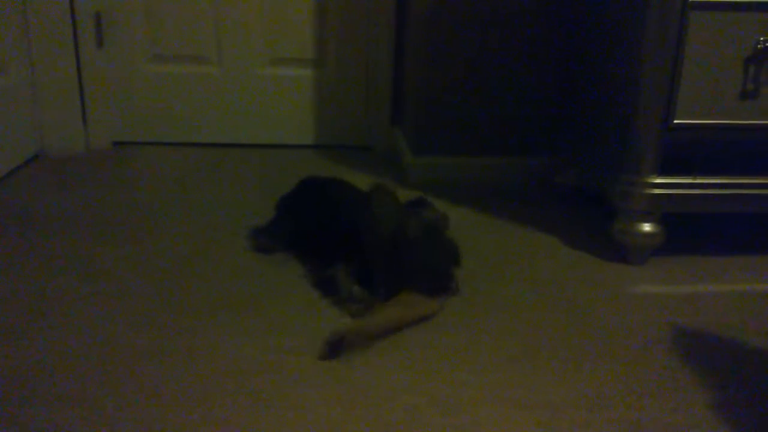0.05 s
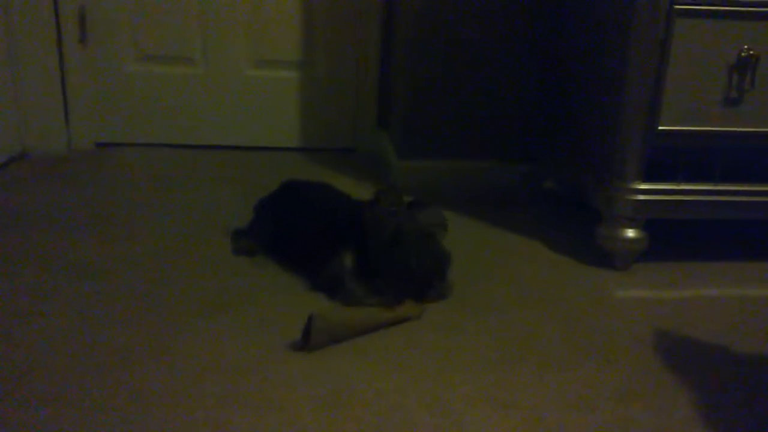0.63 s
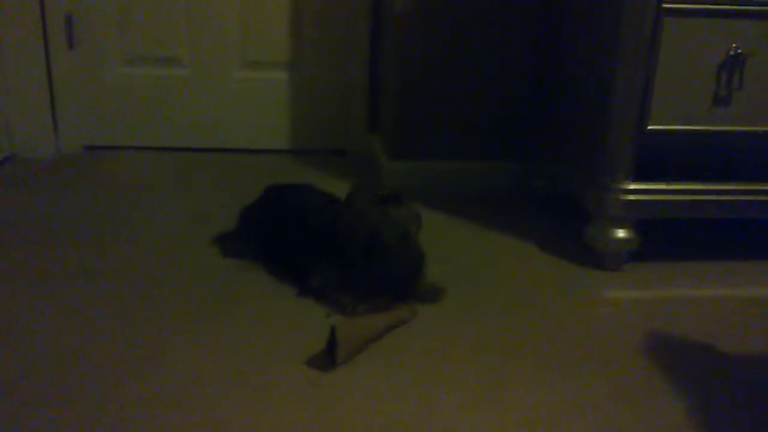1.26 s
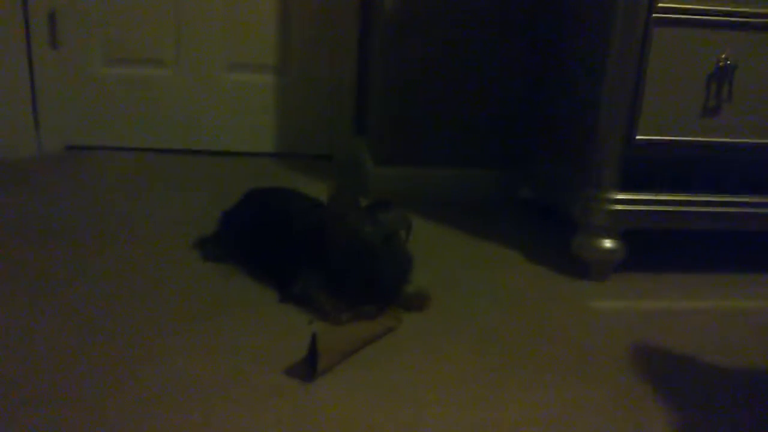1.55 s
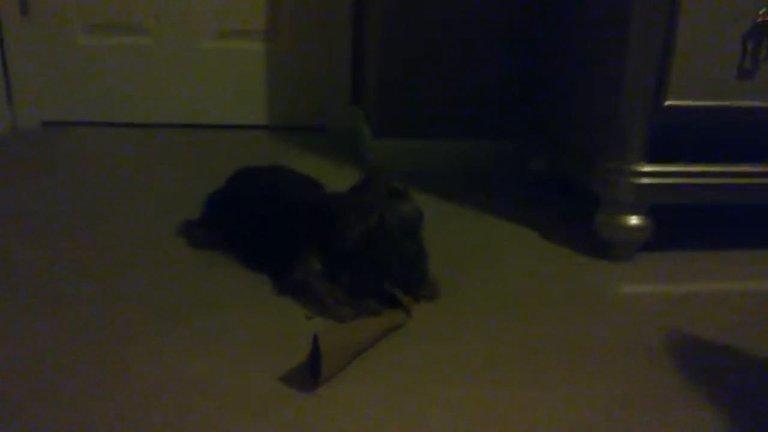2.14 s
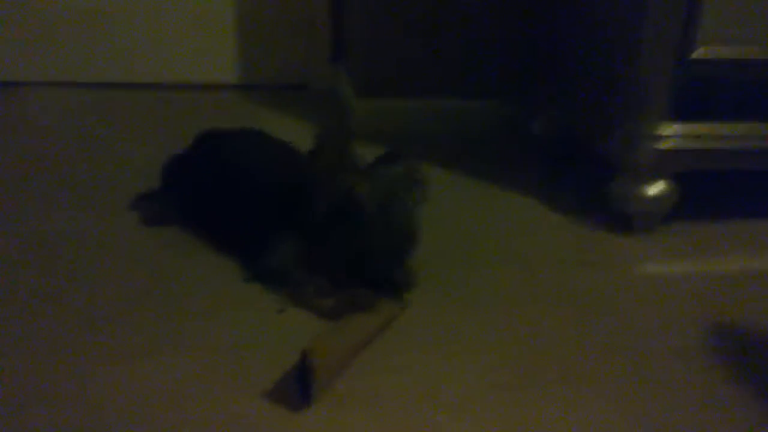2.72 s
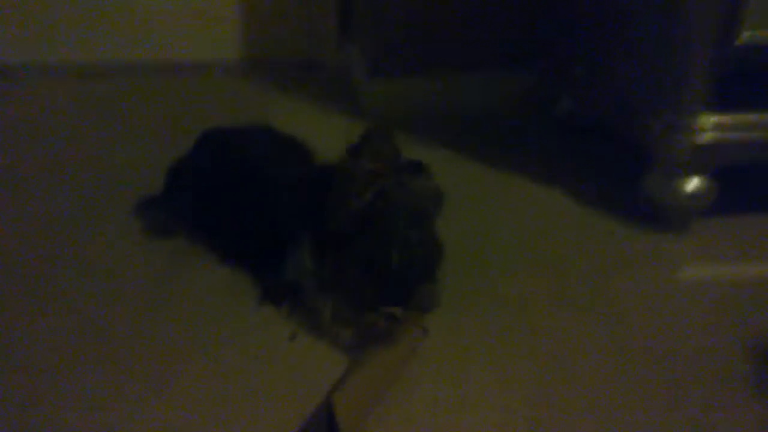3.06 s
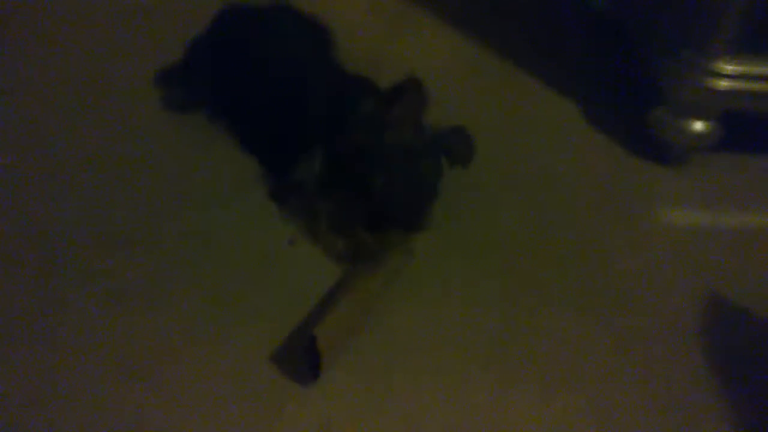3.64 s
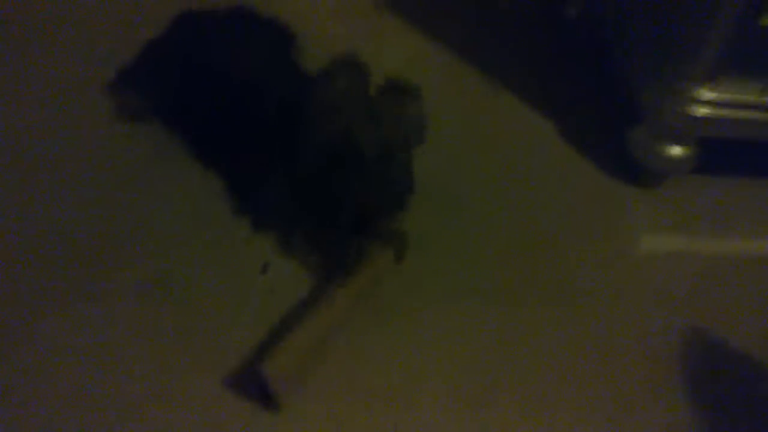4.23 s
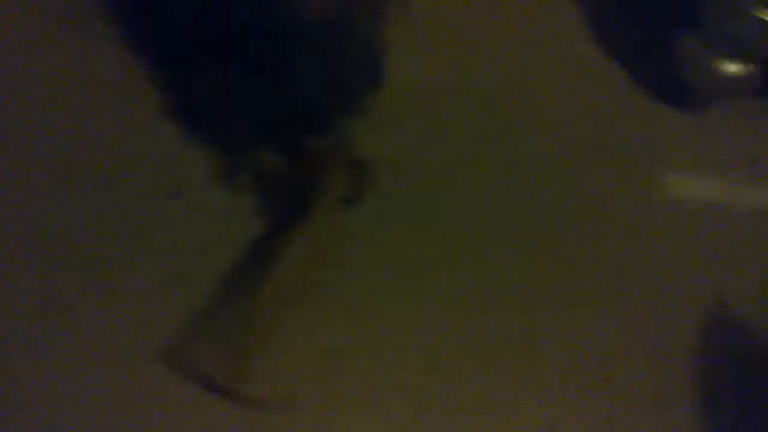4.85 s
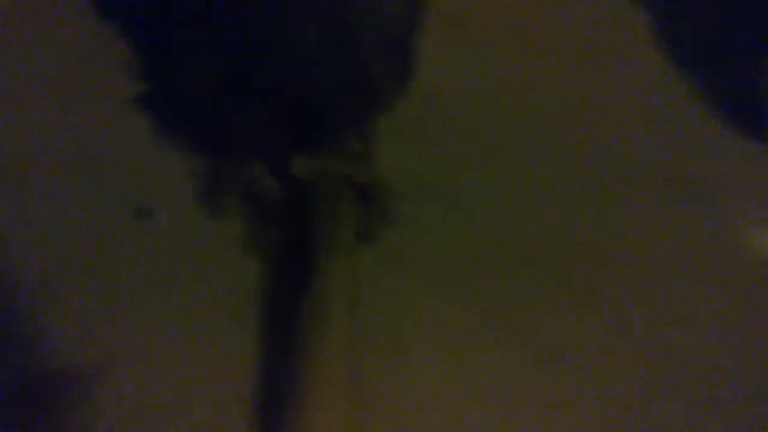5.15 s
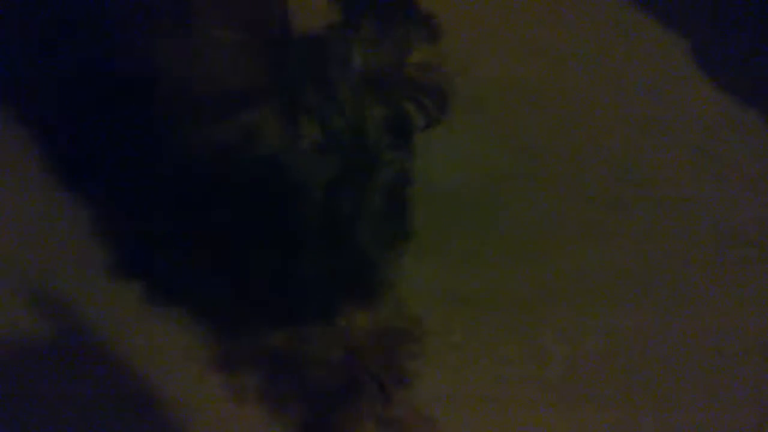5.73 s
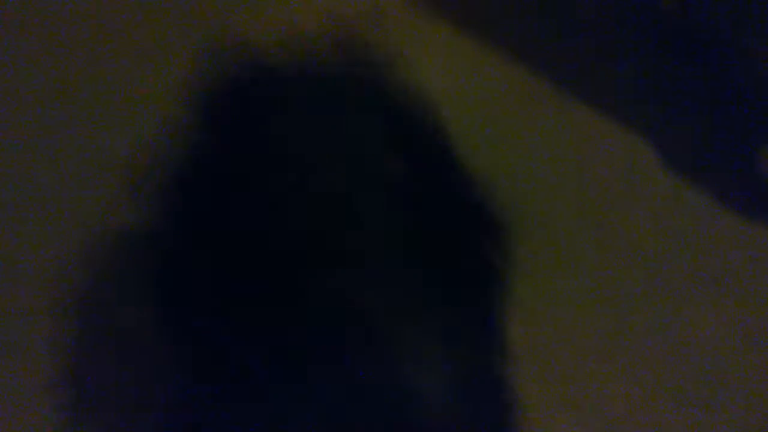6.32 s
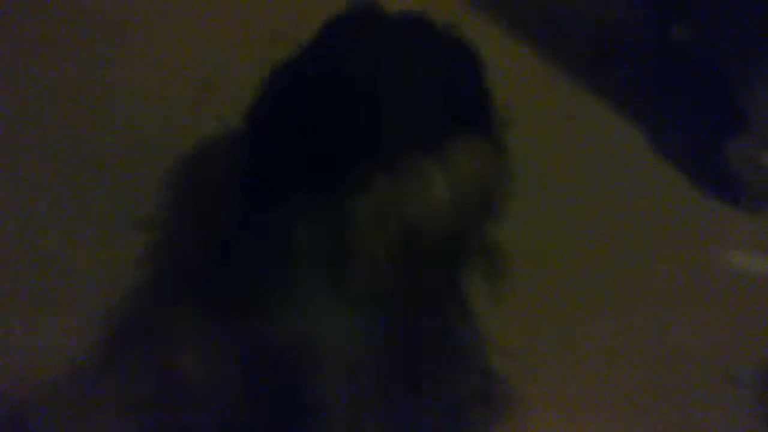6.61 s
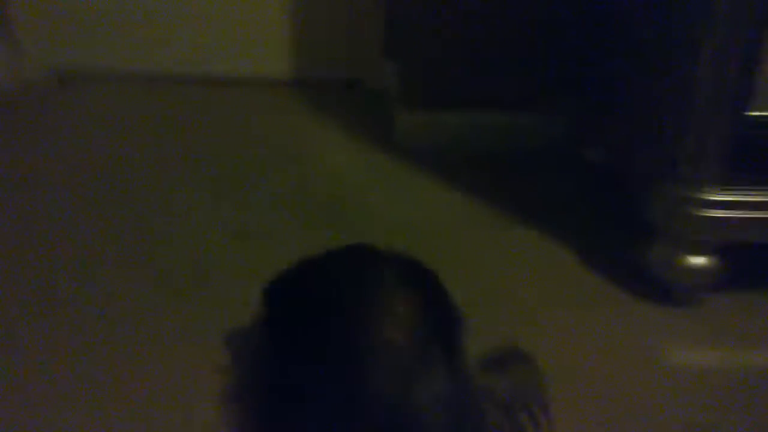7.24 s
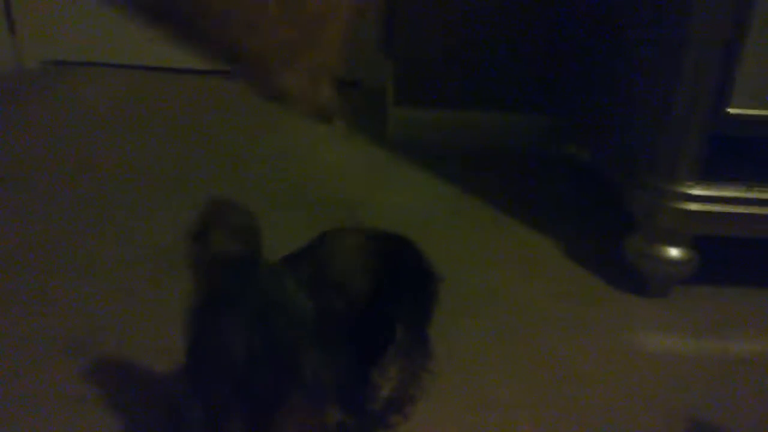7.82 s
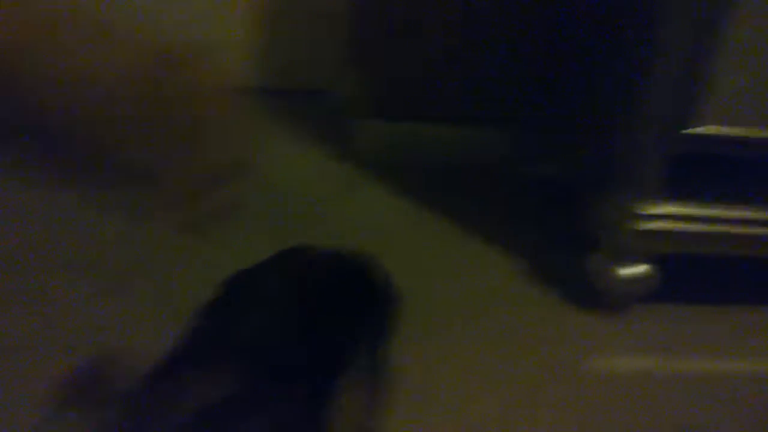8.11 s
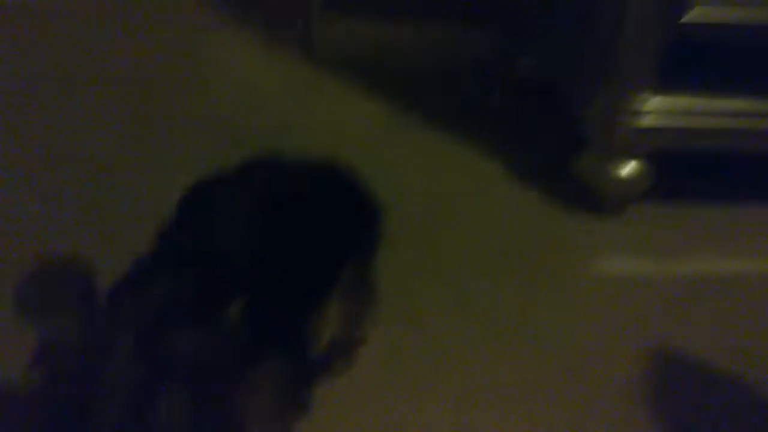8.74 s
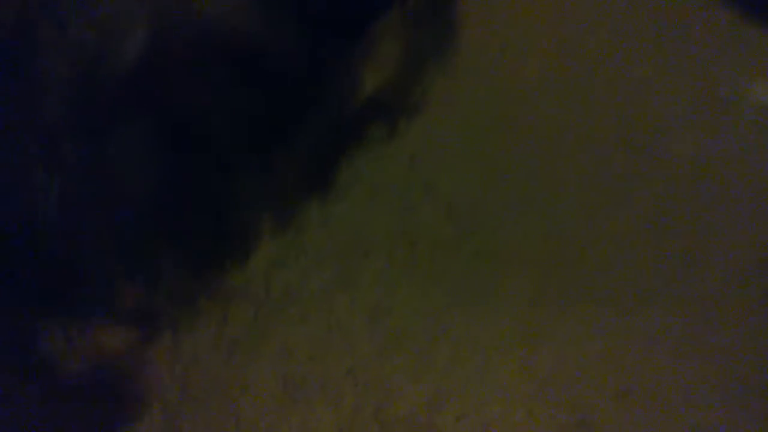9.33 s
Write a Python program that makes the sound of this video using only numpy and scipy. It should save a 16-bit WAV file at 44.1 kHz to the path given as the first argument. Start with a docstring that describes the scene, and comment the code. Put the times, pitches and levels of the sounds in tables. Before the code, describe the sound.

Irregular close bites and scrapes on a cardboard tube, mixed with carpet rustle, soft paw thuds and a dog's clinking tags.

```python
"""First comes a soft brushing on bedroom carpet, with light taps and a jingle of collar tags.
A small dog is worrying a cardboard tube close by, gently at first and hardest in the middle.
Teeth and paws knock and scrape on the hollow tube, and fur and card rub through the carpet pile.
Paws thud on the floor, the metal tags ring as they touch, and the snout noses about in soft puffs.
The tube swishes round once, a hand bumps the microphone once, and a quiet room hisses behind it all."""
import numpy as np
from scipy import signal
from scipy.fft import rfft, irfft
import sys
import numpy as np
from scipy import signal
from scipy.fft import rfft, irfft
from scipy.io import wavfile

SR = 44100
rng = np.random.default_rng(int(sys.argv[2]) if len(sys.argv) > 2 else 0)


def transcribe(signal):
    """Save signal, clipped to [-1, 1], as a 16-bit WAV file at the path in sys.argv[1]."""
    frames = np.atleast_2d(signal).T
    limited = np.clip(frames, -1, 1)
    pcm = np.round(limited * 32767).astype(np.int16)
    wavfile.write(sys.argv[1], SR, pcm)


N = 422037

# bites and taps on the tube (time [s], resonance [Hz], hollow body [dB], crack [dB], treble snap [dB])
BITES = [(0.047, 340, -69, -70, -44.5), (0.305, 2800, -56, -48.5, -37), (0.431, 860, -32.5, -47.5, -40),
         (0.592, 1150, -24.5, -45, -29.5), (0.753, 1000, -51, -42.5, -21.5), (1.235, 616, -50.5, -67, -41),
         (1.745, 1420, -64, -72, -47), (2.866, 1120, -52.5, -53, -36), (3.132, 530, -72, -57, -27.5),
         (3.551, 715, -53.5, -62, -45.5), (3.929, 1160, -41.5, -58, -72), (4.074, 290, -34.5, -46.5, -34),
         (4.119, 650, -36.5, -52, -45), (4.156, 322, -26.5, -44, -47), (4.216, 430, -14.5, -33, -20.5),
         (4.23, 391, -20, -27.5, -34.5), (4.487, 2630, -15.5, -24.5, -20), (4.617, 305, -22, -40.5, -29.5),
         (4.629, 616, -23, -31, -26.5), (4.82, 1430, -19, -29.5, -19.5), (4.841, 1520, -11.5, -16, -13.5),
         (4.934, 520, -23, -16, -26.5), (5.044, 3020, -18.5, -24, -16.5), (5.498, 870, -14.5, -58, -15),
         (5.582, 372, -25, -42, -42), (5.696, 940, -29.5, -61.5, -22.5), (5.738, 300, -23, -34.5, -11),
         (5.975, 716, -25, -56, -13.5), (6.163, 2300, -28, -49, -38), (6.229, 2790, -17.5, -51.5, -21.5),
         (6.786, 1410, -27, -36, -17.5), (7.002, 1660, -17, -27, -3), (7.08, 2564, -17.5, -15.5, -3.5),
         (7.374, 2330, -42, -44, -44), (8.032, 675, -61.5, -74.5, -52), (8.9, 2370, -54.5, -81, -56),
         (9.102, 2360, -44.5, -60.5, -34), (9.29, 2300, -51.5, -77, -36)]
# muzzle, teeth, claws or carpet dragging over the tube
# (time [s], length [s], resonance [Hz], hollow body [dB], treble snap [dB])
STROKES = [(0.44, 0.032, 840, -43.5, -43.5), (0.584, 0.037, 710, -41.5, -51.5),
           (0.655, 0.044, 1500, -46, -32), (0.745, 0.05, 790, -45.5, -32.5),
           (1.25, 0.062, 1260, -61.5, -48), (2.52, 0.049, 530, -65.5, -56), (2.889, 0.033, 360, -39.5, -30),
           (3.203, 0.014, 670, -49.5, -36), (3.341, 0.041, 2800, -54.5, -57), (3.46, 0.058, 1060, -67, -65),
           (3.781, 0.019, 2500, -53, -47.5), (4.227, 0.018, 400, -29, -32),
           (4.347, 0.052, 2800, -38.5, -34), (4.677, 0.01, 1330, -23.5, -24),
           (4.716, 0.019, 1260, -35, -26.5), (4.765, 0.016, 300, -26, -19), (4.848, 0.003, 300, -23.5, -19),
           (4.919, 0.019, 530, -18, -14), (4.948, 0.019, 790, -22, -20), (5.458, 0.026, 500, -38.5, -30.5),
           (5.499, 0.003, 890, -23, -15.5), (5.734, 0.055, 2360, -29.5, -25),
           (5.811, 0.011, 2225, -19, -17), (5.904, 0.024, 380, -33, -30.5), (5.966, .008, 710, -30, -23.5),
           (6.094, 0.0061, 360, -46, -34), (6.208, .02, 600, -29, -19.5), (7.011, .026, 2600, -22.5, -6.5),
           (7.034, 0.033, 1410, -19.5, -11), (8.162, 0.01, 2800, -81.5, -49.5),
           (8.194, 0.018, 630, -69.5, -48.5), (8.608, 0.028, 2400, -66, -53),
           (8.693, 0.042, 790, -70.5, -56), (8.918, 0.036, 890, -79, -46), (9.133, 0.024, 790, -49.5, -39),
           (9.401, 0.044, 960, -40.5, -34.5)]
# the dog shifts itself or the tube (time [s], length [s], tube rubbing [dB], carpet and fur hiss [dB])
BODY_SHIFTS = [(0.004, 0.12, -69, -57), (0.156, 0.16, -66.5, -53), (0.572, 0.18, -51, -41),
               (0.867, 0.25, -67, -51.5), (1.372, 0.09, -68.5, -54.5), (1.554, 0.043, -74.5, -58.5),
               (2.17, 0.018, -86, -68.5), (2.583, 0.1, -72, -63), (2.737, 0.17, -65.5, -52.5),
               (3.027, 0.18, -59.5, -43.5), (3.875, 0.35, -62, -60), (4.09, 0.074, -47.5, -46),
               (4.523, 0.37, -33, -38), (5.12, 0.16, -54, -45), (5.392, .05, -50, -37),
               (5.565, 0.23, -40.5, -39), (5.78, 0.18, -38.5, -34), (6.31, 0.063, -54, -31.5),
               (6.397, 0.2, -49.5, -43), (6.721, 0.15, -49, -41.5), (7.366, 0.031, -53.5, -50),
               (7.569, .03, -68, -57), (8.38, .05, -81.5, -76), (8.757, 0.54, -72, -56),
               (9.193, 0.33, -63, -51.5), (9.507, 0.12, -38.5, -32)]
# paws and body landing on the floor (time [s], level [dB], boom pitch [Hz])
LANDINGS = [(0.189, -49.5, 141), (0.456, -32, 141), (2.89, -45, 190), (4.21, -34, 350), (4.414, -37, 380),
            (4.841, -25.5, 350), (4.932, -27, 288), (5.458, -32, 205), (5.731, -27.5, 228),
            (5.901, -29, 265), (5.969, -28, 247), (6.22, -21.5, 101), (6.36, -40, 200), (6.457, -36.5, 127),
            (6.61, -35.5, 114), (6.775, -31, 203), (6.995, -26, 272), (7.327, -46.5, 196.6),
            (7.557, -43, 98.7), (7.6, -52, 105.3), (9.095, -44, 126), (9.449, -39.5, 186)]
# tags touching (time [s], time until fur damps them [s], collar ring [dB], large tag [dB], small tag [dB])
TAG_TOUCHES = [(0.187, .02, -72, -56, -39), (0.247, .02, -67, -56, -38), (0.255, .02, -57, -52, -32.5),
               (0.277, 0.029, -48, -60, -49), (2.932, .035, -47, -57, -35),
               (3.075, 0.0059, -64, -43, -18.5), (3.079, .056, -47, -50.5, -36),
               (4.394, .015, -66, -50, -33.5), (4.424, .01, -64.5, -44.5, -28.5),
               (6.262, .2, -22.5, -12, -19), (6.288, 0.047, -30.5, -23.5, -28.5),
               (6.56, 0.011, -34.5, -39, -52), (6.591, 0.0054, -40.5, -35.5, -41),
               (6.837, 0.044, -59.5, -49, -22.5), (7.175, .02, -45, -34, -15)]
# the dog nosing about (middle time [s], length [s], level [dB])
SNOUT_PUFFS = [(1.69, .035, -76), (3.254, 0.045, -62), (3.559, 0.14, -71), (5.403, 0.058, -47),
               (6.101, 0.02, -45), (7.963, 0.029, -66.5), (8.212, 0.039, -69.5), (8.716, 0.055, -62),
               (8.944, 0.048, -57), (9.158, 0.1, -50), (9.313, 0.01, -55.5), (9.54, 0.032, -37.5)]

# the tones each metal piece rings with (frequency [Hz], level [dB], time to fade by 60 dB [s])
RING_TONES = [(5700, -39, 0.1), (8337, 5, 0.083), (8200, -8.5, 0.16)]
LARGE_TAG_TONES = [(5610, -26, .35), (8325, -23, .5), (12060, -21, .2), (12210, -15, .19), (12850, -9, .23),
                   (12905, 0, .23), (12960, -9, .2), (15500, -21, .19)]
SMALL_TAG_TONES = [(13300, -16.5, 0.014), (12000, -10.5, .08), (13400, -7, .07), (13500, 3, 0.046),
                   (13600, -5, .05), (14000, -8.5, .05)]

# tone colours: how strong each sound is from low to high (frequency [Hz], level [dB])
TUBE_COLOUR = [(130, -36.5), (230, -17), (350, -6.5), (560, -5), (660, 0), (930, -0.5), (1120, -4.5),
               (1300, -1), (1480, 2), (2100, -2), (2600, -9.5), (3200, -13.5), (4500, -44)]  # the tube's hollow body
CRACK_COLOUR = [(2200, -22), (3100, -10), (4000, -2), (5500, -0.5), (6500, -7.5), (7500, -14),
                (9000, -35.5)]  # its wall cracking
SNAP_COLOUR = [(6000, -37.5), (7600, -22), (8800, -9.5), (10300, -4), (11500, -6), (13200, 3),
               (14500, -1.5), (16000, -6.5)]  # fine fibres snapping
RUB_COLOUR = [(180, -19), (330, -5.5), (560, -5.5), (770, -1.5), (950, -4.5), (1120, -7.5), (1500, -4),
              (1800, -4), (2250, -6), (3100, -13.5), (4800, -21.5), (7500, -23.5), (10000, -52)]  # card rubbing on carpet
PILE_COLOUR = [(2000, -47.5), (3500, -28), (5200, -23.5), (7200, -18.5), (8500, -11.5), (10000, -7.5),
               (11500, -5), (13300, 1.5), (14500, -4.5), (16000, -11.5)]  # carpet pile and fur hissing
RUMBLE_COLOUR = [(20, -1), (45, 1), (110, 1.5), (200, -8), (300, -10), (500, -18), (1000, -51.5)]  # the floor under the moving dog
THUD_COLOUR = [(25, -6.5), (60, -9), (115, -2), (170, -1), (260, -2.5), (400, -7), (900, -41)]  # the floor under a landing
SKID_COLOUR = [(3000, -40), (5000, -16.5), (5800, -9), (6800, -15.5), (11000, -11.5), (13500, -0.5),
               (16000, -5)]  # metal sliding on metal
SNOUT_COLOUR = [(400, -7), (620, -16), (790, 4.5), (1000, -5), (1300, -13), (2000, -11), (2300, -0.5),
                (2550, -11.5), (4500, -53.5)]  # a puff with two hollow resonances
SWISH_COLOUR = [(1500, -28.5), (2600, 1), (3500, -3), (4500, -0.5), (5400, -16.5), (7500, -35.5)]  # the tube sliding round
BUMP_COLOUR = [(20, -2), (35, 9), (55, -12), (100, -31), (300, -60)]  # a hand bumping the microphone
ROOM_COLOUR = [(20, -3), (45, 2), (65, -3), (105, 6), (165, -11), (260, -11.5), (650, -7), (1200, -12),
               (3500, -14.5), (8000, -10.5), (10000, -8), (13200, -7), (16000, -12)]  # the quiet room


def tube():
    """Knocks and scrapes sound the tube's body, wall and fibres, each with its own short echo."""
    body, crack, snap = from_db(-2.5) * knocks() + scrapes()
    return (with_room(body, wet_db=-6.5, fade_s=0.17)
            + with_room(crack, wet_db=-7, fade_s=0.31)
            + with_room(snap, wet_db=-9.5, fade_s=0.12))


def knocks(body_decay_s=0.0049, crack_decay_s=0.005, rise_s=0.0008, click=0.45):
    """Each bite is a click, then fibres crushing under two teeth. Gives body, crack and snap."""
    layers, t = np.zeros((3, N)), np.arange(SR // 12) / SR
    decays_s = [[body_decay_s], [crack_decay_s], [crack_decay_s]]
    first_tooth, second_tooth = (np.exp(-age / decays_s) * np.minimum(age / rise_s, 1)
                                 for age in (t, np.maximum(t - 0.0072, 0)))
    pressure = np.hypot(first_tooth, from_db(-15.5) * second_tooth)  # the later tooth is lighter
    for start, hz, *levels_db in BITES:
        crush = rng.standard_normal((3, len(t))) * pressure
        crush[:, 0] = click * np.linalg.norm(crush, axis=1)
        for layer, part, db in zip(layers, cardboard(*crush, hz, sharpness=2.1), levels_db):
            add(layer, start, from_db(db) * part / np.std(part[:SR // 160]))
    return layers


def scrapes(fall_s=0.01, lead_s=0.006, judder_db=1.5):
    """Each stroke swells, judders along the card and lets go. Gives body, crack and snap."""
    layers, t = np.zeros((3, N)), np.arange(SR // 6) / SR
    judder = from_db(judder_db * drift(260))
    grit = [friction(3500, spread_db=5, smooth=0.7) * judder for _ in layers]
    for start, length, hz, body_db, snap_db in STROKES:
        crack_db = (body_db + snap_db) / 2 - 12.5
        rise = np.minimum(t / (lead_s + length * 0.56), 1) ** 1.3
        release = np.exp(-np.maximum(t - lead_s - length * 1.144, 0) / fall_s)
        pressed = [np.roll(slips, -round(start * SR))[:len(t)] * rise * release for slips in grit]
        parts = cardboard(*pressed, hz, sharpness=4.3)
        for layer, part, db in zip(layers, parts, (body_db, crack_db, snap_db)):
            strength = np.sqrt(np.sum(part ** 2) / (length * SR))
            add(layer, start - lead_s, from_db(db) * part / strength)
    return layers


def cardboard(body, crack, snap, hz, sharpness, boost_db=11):
    """The tube colours every contact, and each spot on it favours one hollow pitch."""
    hollow = body + from_db(boost_db) * resonate(body, hz, sharpness)
    return colour(hollow, TUBE_COLOUR), colour(crack, CRACK_COLOUR), colour(snap, SNAP_COLOUR)


def shuffle():
    """Card and fur slide over the pile in small jerks, and the floor rumbles along."""
    rub_db, hiss_db = movement_levels()
    rumble_db = -61 + 0.64 * ((rub_db + hiss_db) / 2 + 45)  # more movement, more rumble
    jerks = drift(70)
    sliding = from_db(rub_db - 2 + 2 * jerks) * friction(900, spread_db=0.5, smooth=0.8)
    # as the grip shifts, the tube's resonances come and go
    resonances = sum(resonate(sliding, hz, 9) * drift(22) for hz in np.geomspace(330, 2300, num=9))
    rub = colour(sliding + 0.52 * resonances, RUB_COLOUR)
    brushing = from_db(hiss_db + 0.5 + 2.4 * jerks) * friction(3000, spread_db=2.5, smooth=0.89)
    hiss = colour(brushing, PILE_COLOUR)
    rumble = colour(from_db(rumble_db + 1.8 * jerks) * rng.standard_normal(N), RUMBLE_COLOUR)
    # now and then a single fibre crackles
    crackle = colour(from_db(rub_db - 25.5) * friction(40, spread_db=5, smooth=0.11), CRACK_COLOUR)
    return with_room(rub + crackle, wet_db=-14, fade_s=0.047) + hiss + rumble


def movement_levels(gather_db_per_s=402, settle_db_per_s=119, lag_s=0.01, hold_s=0.0083):
    """Rubbing and hiss levels in dB: every movement builds quickly and settles slowly."""
    t = np.arange(0, N, 64) / SR
    # each stroke drags the tube a moment later; the hiss is capped for the sharpest snaps
    drags = [(start + lag_s, length + hold_s, body_db - 9, min(snap_db - 10.5, -29.5))
             for start, length, _, body_db, snap_db in STROKES]
    start, length, rub_db, hiss_db = np.transpose(BODY_SHIFTS + drags)[:, :, None]
    gather_db = -gather_db_per_s * np.maximum(start - t, 0)
    settle_db = -settle_db_per_s * np.maximum(t - start - length, 0)
    levels = []
    for moving_db, resting_db in ((rub_db, -87.5), (hiss_db, -83)):
        power = np.sum(from_db(moving_db + gather_db + settle_db) ** 2, axis=0) + from_db(resting_db) ** 2
        levels.append(np.interp(np.arange(N) / SR, t, 10 * np.log10(power)))
    return levels


def collar(scatter_db=1.5, attack_s=0.00033, damped_s=0.01):
    """Each touch strikes the metal's tones a little unevenly; they ring until fur damps them."""
    out, t = np.zeros(N), np.arange(SR // 2) / SR
    for start, free_s, *strikes_db in TAG_TOUCHES:
        shape = (1 - np.exp(-t / attack_s)) * np.exp(-np.maximum(t - free_s, 0) / damped_s)
        for tones, strike_db in zip((RING_TONES, LARGE_TAG_TONES, SMALL_TAG_TONES), strikes_db):
            hz, tone_db, fade_s = np.transpose(tones)[:, :, None]
            struck_db = strike_db + 6.5 + tone_db + scatter_db * rng.standard_normal(hz.shape)
            waves = np.sin(2 * np.pi * (hz * t + rng.random(hz.shape)))
            add(out, start, shape * np.sum(from_db(struck_db - 60 * t / fade_s) * waves, axis=0))
        # the small tag skids across its neighbour
        skid = colour(rng.standard_normal(len(t)) * np.exp(-t / 0.0094), SKID_COLOUR)
        add(out, start, from_db(strikes_db[-1] - 5) * skid)
    return with_room(out, wet_db=-9.5, fade_s=0.2)


def paws(rise_s=0.0018, decay_s=0.022, gain_db=-1.5):
    """Soft landings shake the carpeted floor, which booms briefly."""
    out, t = np.zeros(N), np.arange(SR // 4) / SR
    for start, db, hz in LANDINGS:
        push = rng.standard_normal(len(t)) * np.minimum(t / rise_s, 1) * np.exp(-t / decay_s)
        thud = colour(push + from_db(10) * resonate(push, hz, sharpness=4), THUD_COLOUR)
        add(out, start, from_db(db + gain_db) * thud / np.abs(thud).max())
    return out


def snout():
    """The dog noses about in soft, hollow puffs."""
    return puffs(SNOUT_PUFFS, SNOUT_COLOUR)


def tube_swish(time_s=5.25, length_s=0.11, level_db=-48.5):
    """The tube slides round with one soft swish."""
    return puffs([(time_s, length_s, level_db)], SWISH_COLOUR)


def hand_bump(time_s=4.555, length_s=0.05, level_db=-39.5):
    """The hand holding the microphone bumps it, making one deep thump."""
    return puffs([(time_s, length_s, level_db)], BUMP_COLOUR)


def quiet_room(level_db=-74.5):
    """The room's faint, steady hiss."""
    return from_db(level_db) * colour(rng.standard_normal(N), ROOM_COLOUR)


def with_room(x, wet_db, fade_s, build_s=0.00044):
    """Add the room's dense echo, which builds up and then drops 60 dB in fade_s."""
    t = np.arange(SR // 2) / SR
    tail = rng.standard_normal(len(t)) * from_db(-60 * t / fade_s) * (1 - np.exp(-(t / build_s) ** 2))
    return x + from_db(wet_db) * signal.oaconvolve(x, tail / np.linalg.norm(tail))[:N]


def puffs(rows, spectrum):
    """Rounded swells of noise, from rows of (middle time [s], length [s], level [dB])."""
    t = np.arange(N) / SR
    swell = sum(from_db(db) * np.exp(-2 * ((t - middle) / length) ** 2) for middle, length, db in rows)
    return colour(swell * rng.standard_normal(N), spectrum)


def friction(slips_per_s, spread_db, smooth):
    """Rubbing is many tiny slips of uneven size over a smooth hiss."""
    sizes = from_db(spread_db * np.minimum(rng.exponential(1, N), 4)) * rng.choice([-1, 1], N)
    slips = unit_level(sizes * (rng.random(N) < slips_per_s / SR))
    return unit_level(slips + smooth * rng.standard_normal(N))


def drift(points_per_s):
    """A curve that wanders from one random value to the next."""
    points = rng.standard_normal(N // 16)
    return unit_level(np.interp(np.arange(N) / SR * points_per_s, np.arange(len(points)), points))


def resonate(x, hz, sharpness):
    """Keep the part of a sound near one pitch."""
    return signal.lfilter(*signal.iirpeak(hz, sharpness, fs=SR), x)


def colour(x, spectrum, size=8192):
    """Filter a sound to a tone colour; white noise keeps its level."""
    hz, db = np.transpose(spectrum)
    grid_hz = np.arange(size // 2 + 1) * SR / size + 1
    log_gain = np.log(from_db(np.interp(np.log(grid_hz), np.log(hz), db)))
    # minimum phase: the filter never rings before the sound arrives
    cepstrum = irfft(log_gain)[:size // 2]
    cepstrum[1:] *= 2
    response = irfft(np.exp(rfft(cepstrum, size)))
    return signal.oaconvolve(x, response / np.linalg.norm(response))[:N]


def add(out, start_s, sound):
    """Mix a sound in from start_s on."""
    at = max(0, round(start_s * SR))
    out[at:at + len(sound)] += sound[:max(0, N - at)]


def unit_level(x):
    """Scale to an average (rms) level of 1."""
    return x / np.sqrt(np.mean(x ** 2) + 1e-20)


def from_db(db):
    """Turn decibels into a gain."""
    return 10 ** (np.asarray(db) / 20)


def scene():
    """The dog and its toy over the hiss of a quiet room, in one channel."""
    background = quiet_room()
    movements = shuffle() + snout() + paws() + collar() + tube_swish() + hand_bump()
    return (tube() + movements + background)[None]


def record(dry):
    """Round off the loudest peaks and cut the highest treble."""
    rounded = dry / (1 + dry ** 4) ** 0.25
    treble_cut = signal.ellip(12, 0.1, 70, 15950, fs=SR, output="sos")
    return signal.sosfilt(treble_cut, rounded)


dry = scene()
out = record(dry)
transcribe(out)
```